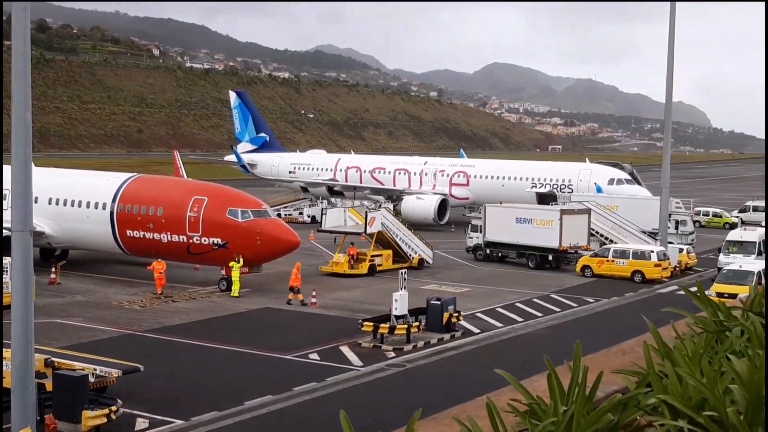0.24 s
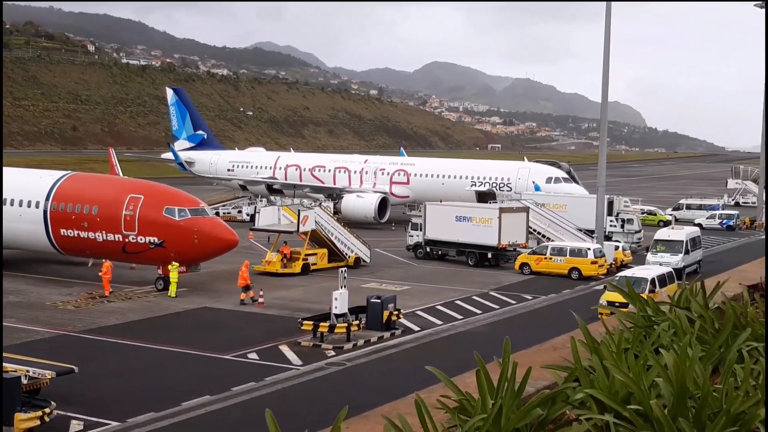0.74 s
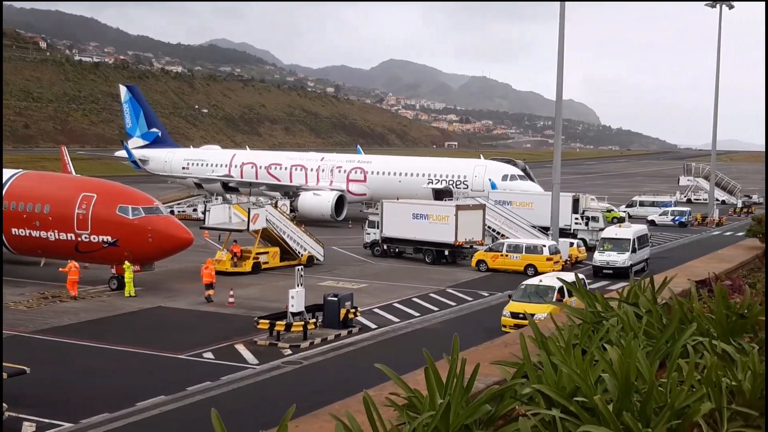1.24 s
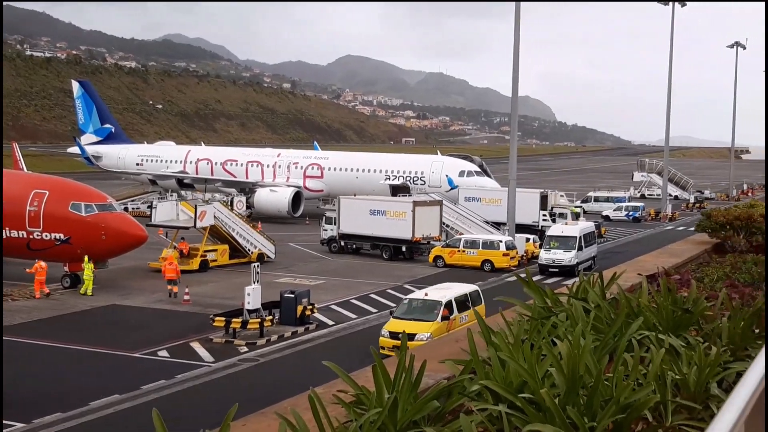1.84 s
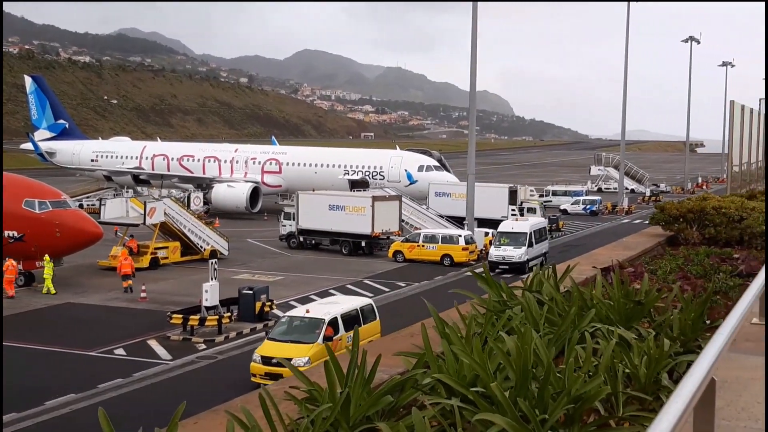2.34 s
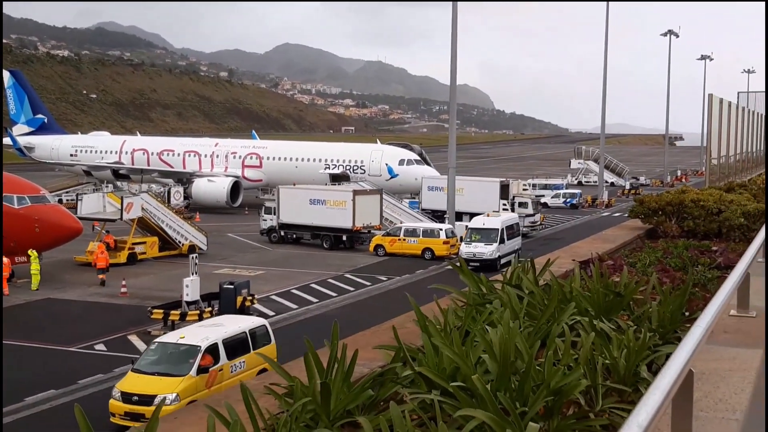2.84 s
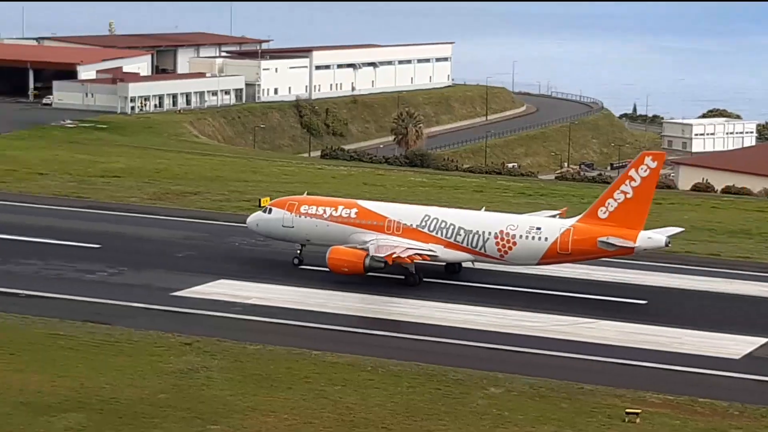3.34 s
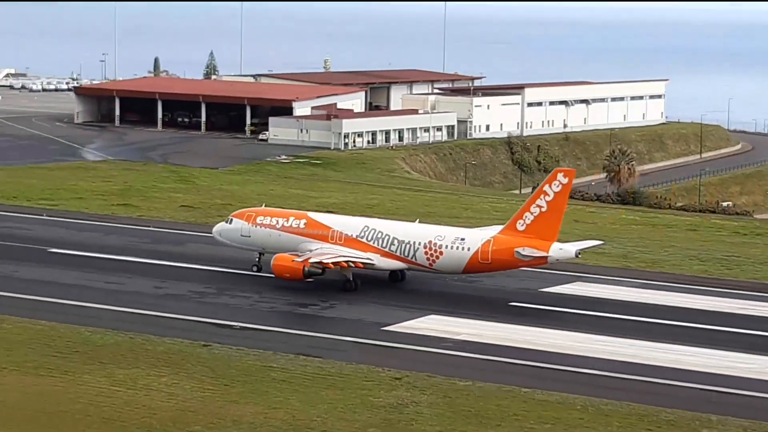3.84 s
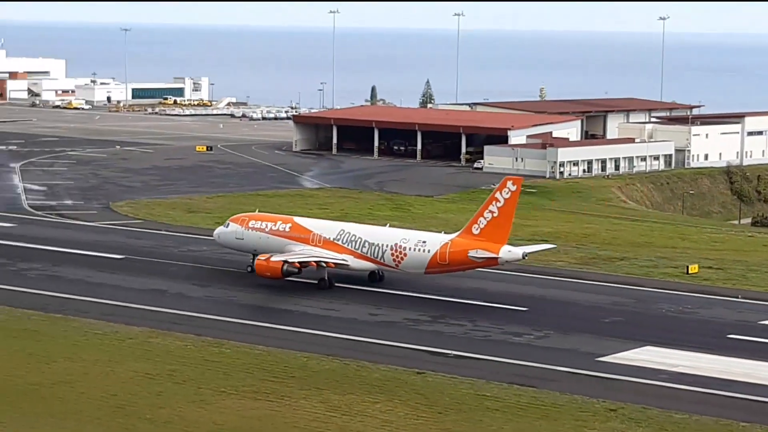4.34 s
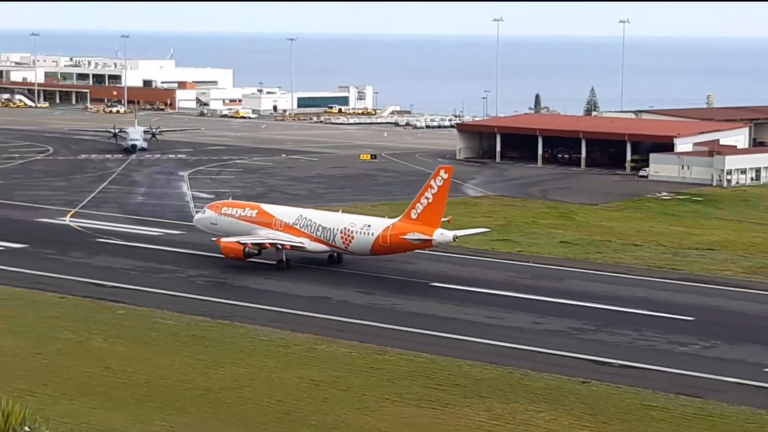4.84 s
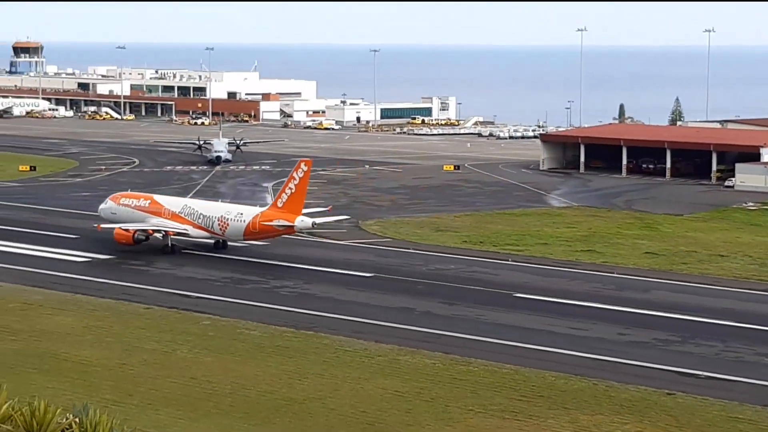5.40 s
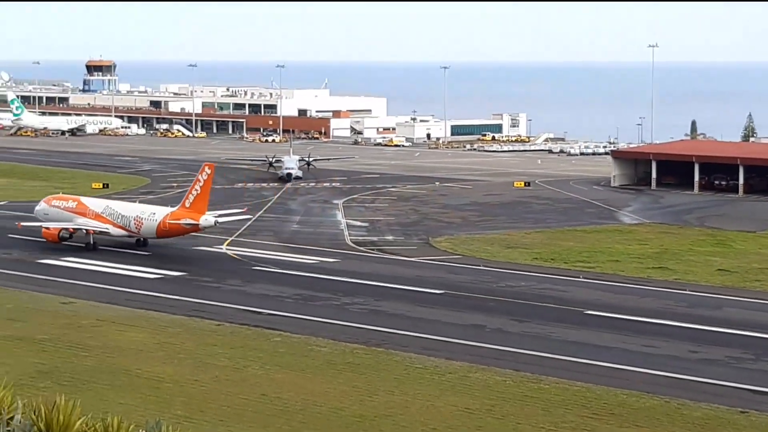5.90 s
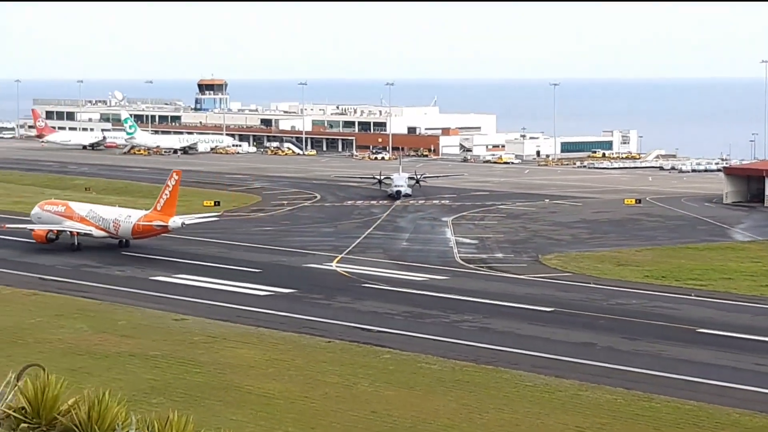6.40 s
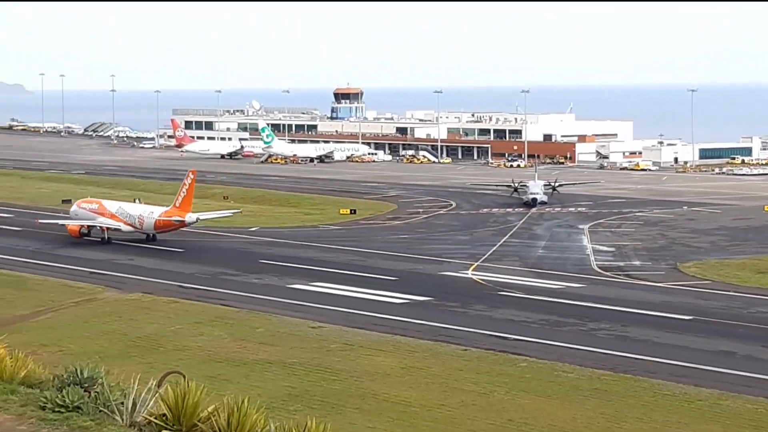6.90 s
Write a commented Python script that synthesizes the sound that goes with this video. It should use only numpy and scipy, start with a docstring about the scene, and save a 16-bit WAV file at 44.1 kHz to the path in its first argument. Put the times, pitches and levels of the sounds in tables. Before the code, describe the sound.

Outdoors on an airport terrace, a low distant rumble mixes with thin, fluttering hiss from idling turbines, while small gusts softly thump the microphone. After about three seconds it cuts to a very brief silence, then a much louder jet at take-off thrust bursts in: broad exhaust roar, rushing fan hiss and a piercing whine that slides down and fades as the aircraft rolls away.

```python
"""A distant rumble and the hiss of idling turbines fill an airport terrace; puffs of breeze thump the microphone.
After a very short silence an airliner rolls away at take-off thrust: exhaust roar, fan hiss and a falling whine.
Apron and roar are noise shaped over time and frequency; each puff is a short burst of low noise.
The whine is a set of tones from two fans, lowered by the aircraft's retreat.
Reflections close to the microphone cut notches into the aircraft's sound."""
import sys
import numpy as np
from scipy import signal
from scipy.io import wavfile
from scipy.ndimage import uniform_filter1d, minimum_filter1d

SR = 44100
rng = np.random.default_rng(int(sys.argv[2]) if len(sys.argv) > 2 else 0)


def pcm_store(signal):
    """Save signal as 16-bit PCM."""
    levels = np.round(np.clip(np.atleast_2d(signal), -1, 1) * 32767)
    wavfile.write(sys.argv[1], SR, levels.astype(np.int16).T)


N = 315755
TIME = np.arange(N) / SR
APRON_END, JET_START = 3.143, 3.216  # s
SIZE, HOP = 2048, 512  # samples in a short-time frame, and from one frame to the next
FRAME_S = np.arange(N // HOP + 5)[:, None] * HOP / SR
BIN_HZ = np.fft.rfftfreq(SIZE, 1 / SR)


def gain_of(db):
    """Turns decibels into amplitude."""
    return 10 ** (np.asarray(db) / 20)


def evened(x):
    """Scales a signal to rms 1."""
    return x / np.sqrt(np.mean(abs(x) ** 2) + 1e-20)


def read(points, column=1):
    """Reads one column of a spectrum table at every bin, along log frequency."""
    table = np.transpose(points)
    return np.interp(np.log(BIN_HZ + 1), np.log(table[0] + 1), table[column])


def curve(points):
    """Reads a table of times and levels at every frame."""
    return np.interp(FRAME_S, *np.transpose(points))


def bell(x, centre, half_width):
    """Draws a smooth hump of height 1, down to 1/e at the half width."""
    return np.exp(-((x - centre) / half_width) ** 2)


def above(corner_hz):
    """Rises gently from 0 in the bass to 1 in the treble, with one half at the corner."""
    return BIN_HZ ** 2 / (BIN_HZ ** 2 + corner_hz ** 2)


def noise():
    """Draws random short-time spectra, which sound as steady noise."""
    shape = (len(FRAME_S), len(BIN_HZ))
    return rng.standard_normal(shape) + 1j * rng.standard_normal(shape)


def patches(length_s, width_hz):
    """Smooths chance over time and frequency into patches of rms 1; larger settings give larger patches."""
    white = noise().real
    rate = np.fft.fftfreq(len(FRAME_S), HOP / SR)[:, None]
    lag = np.fft.fftfreq(len(BIN_HZ), SR / SIZE)
    smoothing = bell(rate * length_s, 0, 0.74) * bell(lag * width_hz, 0, 0.86)
    return evened(np.fft.ifft2(np.fft.fft2(white) * smoothing).real)


def wander(rate_hz):
    """Joins random points, this many per second, into a wavering line."""
    points = rng.standard_normal(N // 50)
    return np.interp(TIME * rate_hz, np.arange(len(points)), points)


def to_sound(z):
    """Turns short-time spectra (ports, frames, bins) into samples."""
    return signal.istft(np.swapaxes(z, -1, -2), nperseg=SIZE, noverlap=SIZE - HOP)[1][..., :N]


def lead(ms):
    """Turns the phase of a sound so that it arrives earlier."""
    return np.exp(2j * np.pi * BIN_HZ * ms / 1000)


# colour of the apron din; only its shape counts: f/Hz, level/dB per Hz
APRON_SPECTRUM = [(35, -29), (66, -2), (102, -2.5), (200, -9.5), (342, -5), (431, -6.5), (819, -11.5),
                  (1090, -12.5), (1450, -14), (2150, -15.5), (2450, -16.5), (2780, -22), (3050, -19),
                  (3350, -17.5), (4600, -21), (5610, -21), (7200, -25.5), (8550, -30), (10600, -34),
                  (15000, -33.5)]
# how alike the din is at left and right: f/Hz, likeness (0 to 1)
APRON_LIKENESS = [(60, 0.27), (220, 0.35), (420, 0.46), (780, 1), (1050, 0.99), (1400, 0.69), (1900, 0.041),
                  (5800, 0.13), (12000, 0.1)]
# hums and whistles of idling turbines and motors: f/Hz, half width/Hz, level over the din/dB
TURBINE_HUMS = [(12850, 930, 16.5), (9680, 120, 10), (9000, 85, 6), (807, 20, 5.5), (417, 15, 0),
                (312, 21, 2.5)]
# rise and fall of the treble; only departures from the mean count: t/s, level/dB
TREBLE_COURSE = [(0.0, -49), (0.85, -51.5), (1.05, -50), (1.06, -52.5), (1.33, -50), (2.3, -53),
                 (2.37, -50), (2.61, -53.5), (3.02, -50), (3.12, -52.5)]
# drops of the breeze, which dip the apron's bass: t/s, half length/s, level/dB
BREEZE_LULLS = [(0.58, .1, -4.5), (1.28, .12, -6), (1.71, .035, -4), (2.93, 0.074, -3)]
# passing colours in the din: t/s, half length/s, f/Hz, half width/Hz, level/dB, left over right/dB
PASSING_SWELLS = [(0.41, .1, 5600, 620, 7.5, -1), (0.77, 0.27, 5460, 650, 7.5, 0),
                  (0.54, 0.31, 7400, 820, 2.5, -3), (1.35, 0.14, 5600, 440, 7, -1),
                  (1.6, 0.36, 5300, 430, 2.5, -3), (1.55, .5, 7000, 700, 0, -3),
                  (1.25, 0.23, 3720, 130, 5, 0), (1.7, 0.19, 3730, 260, 4, 2), (1.7, 0.17, 3040, 100, 6, 0),
                  (2.07, .15, 3000, 120, 11, 2), (0.47, .6, 1420, 130, 4, -3),
                  (1.36, 0.24, 1460, 190, 6.5, -3), (2.07, 0.26, 1420, 170, 3.5, -4),
                  (2.11, 0.2, 2050, 190, 10, 1), (2.58, 0.24, 2150, 170, 6, 0),
                  (2.38, 0.18, 7700, 900, 6.5, -1), (2.83, 0.3, 7560, 520, 8.5, -1),
                  (2.9, .15, 5100, 380, 4.5, 1), (0.15, 0.23, 560, 64, 7, -1),
                  (0.28, 0.82, 720, 100, 1, -2), (0.03, 0.13, 2600, 110, 5, 0)]
APRON_DB = -35.5  # rms level of the apron


def apron():
    """Shapes noise into distant engines and ground vehicles, with the high hiss of idling turbines."""
    db = read(APRON_SPECTRUM) + sum(peak_db * bell(BIN_HZ, hz, width) for hz, width, peak_db in TURBINE_HUMS)
    treble = above(1300)
    db = db + treble * (curve(TREBLE_COURSE) - np.transpose(TREBLE_COURSE)[1].mean())
    db = db - (1 - treble) * 0.5 * (FRAME_S - APRON_END / 2)  # the bass fades by 0.5 dB per s
    lull_db = sum(dip_db * bell(FRAME_S, s, length) for s, length, dip_db in BREEZE_LULLS)
    db = db + lull_db * bell(BIN_HZ, 0, 280)
    db = db + 1.47 * patches(0.032, 440)
    flutter_db = 0.84 - bell(BIN_HZ, 0, 300)  # quick flicker, mostly above the bass
    db = db + flutter_db * patches(0.0084, 19000)
    swells_db = [sum((swell_db + side * pan_db / 2) * bell(FRAME_S, s, length) * bell(BIN_HZ, hz, width)
                     for s, length, hz, width, swell_db, pan_db in PASSING_SWELLS)
                 for side in (1, -1)]
    db = db + np.array(swells_db)
    same = np.clip(read(APRON_LIKENESS), 0, 1)
    right = noise()
    # the part that both ports share reaches the left one 0.26 ms earlier
    left = same * right * lead(0.26) + np.sqrt(1 - same ** 2) * noise()
    sound = to_sound(np.array([left, right]) * gain_of(db))
    return gain_of(APRON_DB) * sound / sound[:, TIME < APRON_END].std()


# strongest puffs of wind, level before the final halving:
# t/s, half length/s, level/dB, lowest f/Hz, top f/Hz, left over right/dB
WIND_PUFFS = [(0.04, 0.012, -39.5, 60, 161, 0), (0.167, 0.021, -36, 65, 131, 0),
              (0.327, 0.019, -38, 60, 300, -2), (0.382, 0.024, -41, 241, 340, 3),
              (0.684, .02, -37, 280, 430, 0), (0.738, 0.015, -35, 60, 130, -2),
              (0.865, 0.018, -33.5, 65, 380, 2), (0.909, .018, -38, 70, 200, -4),
              (0.978, 0.039, -35.5, 70, 430, -1), (1.036, 0.015, -33.5, 90, 263, 0),
              (1.321, 0.0091, -33.5, 200, 553, -3), (1.47, 0.033, -33.5, 74.5, 480, 2),
              (1.597, 0.013, -34, 70, 260, 1), (1.626, .012, -39, 70, 380, 1),
              (1.762, 0.0086, -32.5, 100, 520, -2), (2.044, 0.017, -42.5, 70, 200, -14),
              (2.165, 0.014, -41, 70, 160, -1), (2.39, 0.023, -41, 200, 400, -1),
              (2.523, 0.032, -35, 65, 150, -1), (2.546, .012, -33, 250, 398, -2),
              (2.611, 0.012, -30.5, 170, 423, 4), (2.795, 0.025, -35, 65, 230, 1),
              (3.099, 0.012, -31, 70, 190, -7)]


def wind():
    """Lets each eddy push on the two ports, partly alike, with a dull and hollow thump."""
    out = np.zeros((2, N))
    shared = 0.38  # share of the push's power that is common to both ports
    hollow = signal.iirnotch(205, 3.3, SR)  # a gap at 205 Hz
    for s, length, db, low_hz, top_hz, pan_db in WIND_PUFFS:
        near = abs(TIME - s) < 3 * length
        band = signal.butter(3, [low_hz, top_hz], "bandpass", fs=SR, output="sos")
        common = np.sqrt(shared) * rng.standard_normal(SR // 2)
        push = common + np.sqrt(1 - shared) * rng.standard_normal((2, SR // 2))
        push = signal.lfilter(*hollow, signal.sosfilt(band, push))
        eddy = push[:, -near.sum():] * bell(TIME[near], s, length)
        side_db = np.array([[pan_db], [-pan_db]]) / 2
        out[:, near] += gain_of(db + side_db) * evened(eddy) / 2
    return out


# notches where near reflections cancel the direct sound; a strength over 1 means the reflection is louder:
# f/Hz, width/Hz, strength, shift at the start of the roll/Hz
LEFT_NOTCHES = [(221, 214, .52, 0), (460, 170, .45, 110), (980, 340, .49, 0), (1755, 265, .56, 30),
                (2243, 330, .95, 130), (2740, 270, .92, 180), (3265, 230, .8, 50), (3830, 270, .72, -70),
                (4450, 356, .58, -160), (5850, 330, .45, -200), (6850, 400, .4, -150), (8700, 600, .4, 0),
                (10900, 500, .3, 0)]
RIGHT_NOTCHES = [(211, 120, .6, 0), (515, 200, .48, 50), (1215, 190, .78, 0), (1875, 370, 1.02, -80),
                 (2445, 140, .95, 0), (2990, 380, 1.0, -10), (3610, 318, .95, 90), (4330, 350, 1.45, -30),
                 (5020, 300, 1.3, -90), (5700, 280, .62, 0), (6520, 260, .5, -230), (7020, 340, .45, -220),
                 (7700, 300, .3, 450), (8750, 380, .45, 0), (9570, 220, .45, 0), (10850, 400, .35, 0)]


def ports():
    """Filters the aircraft for each port; the notches slide as the angle changes along the roll."""
    rolled = np.clip((FRAME_S - JET_START) / (TIME[-1] - JET_START), 0, 1)

    def notched(notches):
        """Cancels the sound around each sliding notch frequency."""
        return np.prod([1 - strength / (1 + 2j * (BIN_HZ - hz - slide * (1 - rolled) ** 2) / width)
                        for hz, width, strength, slide in notches], axis=0)

    left_lead_ms = 0.043 + 0.12 * rolled
    return np.array([notched(LEFT_NOTCHES) * lead(left_lead_ms), notched(RIGHT_NOTCHES)])


RUNWAY_M, PAST_M = 170, 10  # distance to the runway; how far past the terrace the roll begins
SPEED_M_PER_S, ACCEL_M_PER_S2, SOUND_M_PER_S = 48, 1, 343  # speed at the start, its growth, speed of sound
FAN_HZ = 2656  # blade tone at the engine


def roll(s):
    """Places the aircraft: distance in m, cosine of the angle from astern, fan pitch lowered by its retreat."""
    since = np.maximum(s - JET_START, 0)
    along = PAST_M + SPEED_M_PER_S * since + ACCEL_M_PER_S2 * since ** 2 / 2
    distance = np.hypot(RUNWAY_M, along)
    astern = along / distance
    retreat = (SPEED_M_PER_S + ACCEL_M_PER_S2 * since) * astern
    return distance, astern, FAN_HZ / (1 + retreat / SOUND_M_PER_S)


# turbulent air makes single partials flare up or drop: t/s, half length/s, multiple of the fan tone, level/dB
PARTIAL_FLARES = [(3.8, 0.06, 1, 4.5), (4.06, 0.07, 1, 5), (4.34, 0.07, 1, -6), (4.85, .1, 1, 2),
                  (5.57, .11, 1, 9), (5.84, .07, 1, 4), (6.35, .11, 1, 9), (6.59, .05, 1, 6),
                  (3.28, .08, 2, 6), (3.5, .05, 2, -5), (3.74, .05, 2, -6), (3.88, 0.055, 2, 7),
                  (4.07, .03, 2, 3), (4.2, 0.04, 2, 8), (4.2, 0.025, 3, 17), (4.71, 0.07, 2, 6.5),
                  (4.57, .05, 3, 13)]


def flare(s, multiple):
    """Gives the dB by which turbulence lifts one partial of the fan at time s."""
    return sum(db * bell(s, at, length) for at, length, k, db in PARTIAL_FLARES if k == multiple)


# colour of the engine roar halfway through the roll; only its shape counts:
# f/Hz, left level/dB per Hz, right level/dB per Hz
ROAR_SPECTRUM = [(32, -36, -32), (65, -16, -3.5), (100.5, 1, -0.5), (301, -4, 1), (402, -10.5, -10.5),
                 (676, -13, -13.5), (1090, -21.5, -19.5), (1350, -19.5, -19.5), (1550, -22.5, -20.5),
                 (2100, -22.5, -20.5), (2700, -22.5, -20.5), (3060, -25, -20), (3950, -26.5, -29),
                 (4950, -32.5, -26), (5380, -35.5, -26.5), (6100, -40, -28), (7800, -42.5, -41),
                 (8450, -50, -48.5), (10460, -57.5, -57), (12350, -62.5, -64), (13800, -82, -80)]
# how much stronger each band is straight behind than at the side: f/Hz, level/dB
REARWARD_BEAM = [(50, -6), (130, 6), (300, -3.5), (700, -4), (1400, -3), (2200, -1.5), (4000, 2),
                 (5200, -14), (6400, 6.5), (8000, -11), (10500, -25.5), (13000, -32)]
# wavering of the hiss: t/s, level/dB
HISS_COURSE = [(3.22, 5.5), (3.5, 3), (4.0, -1), (4.2, 1), (4.4, -1), (4.7, 0), (5.1, -1), (5.45, -4.5),
               (6.05, -4.5), (6.35, -0.8), (7.15, -4)]
# wavering of the highest hiss: t/s, level/dB
TOP_HISS_COURSE = [(3.22, -8.5), (4.2, 1), (4.4, -3), (4.7, 2), (5.3, 3.5), (5.8, 7), (7.15, 3.5)]
# wavering of the deepest rumble: t/s, level/dB
DEEP_RUMBLE_COURSE = [(3.25, 8), (3.5, -2), (3.72, -14), (4.05, -18), (4.3, -17), (4.9, 0.5), (5.5, -4),
                      (6.25, 3), (6.7, 12), (7.15, -2)]
# surges of the exhaust's bass: t/s, level/dB
BASS_SURGES = [(3.5, -3.5), (3.78, 3.5), (4.15, 5), (4.47, 9), (4.7, 5.5), (5.2, 3.5), (5.65, -1.5),
               (6.12, 6.5)]
# partials of the fan and their noisy skirts, played by exhaust() and whine():
# multiple, level/dB, fading/dB per s, skirt level/dB, skirt centre above the partial/Hz,
# skirt half width/Hz, lobe direction (cosine from astern), lobe level/dB
FAN_PARTIALS = [(1, -0.5, 2, 3.5, 130, 120, 0.25, 6), (2, -3, 7, 0.5, 220, 180, 0.22, 6),
                (3, -15, 7, 1, -250, 380, 0.67, 3), (4, -29, 12, 12, -2, 80, .15, 0)]
JET_DB = -12.5  # rms level of the roar
AIR_DB_PER_M = 0.1274  # loss in air at 10 kHz; it grows with the square of frequency


def exhaust(paths):
    """Shapes jet mixing noise and fan hiss by distance, angle and air loss; turbulence makes them waver."""
    distance, astern, fan_hz = roll(FRAME_S)
    mid_distance, mid_astern, _ = roll((JET_START + TIME[-1]) / 2)
    turned = astern - mid_astern
    db = read(REARWARD_BEAM) * turned - 20 * np.log10(distance / mid_distance)
    db = db - AIR_DB_PER_M * (distance - mid_distance) * (BIN_HZ / 10 ** 4) ** 2
    for multiple, _, _, skirt_db, above_hz, width, _, _ in FAN_PARTIALS:
        # the skirts die away after the start, and follow the flares a little
        lift_db = skirt_db * bell(FRAME_S, JET_START, 1.4) + 0.23 * flare(FRAME_S, multiple)
        db = db + lift_db * bell(BIN_HZ, multiple * fan_hz + above_hz, width)
    db = db + 12 * turned * bell(BIN_HZ, 2800, 600)  # the nozzles beam their rush rearwards
    db = db + curve(HISS_COURSE) * above(2040)
    db = db + curve(TOP_HISS_COURSE) / (1 + (8600 / (BIN_HZ + 1)) ** 8)
    # the body of the roar drains away ever faster
    db = db - 0.19 * (FRAME_S - JET_START) ** 2 * bell(BIN_HZ, 340, 190)
    db = db + curve(DEEP_RUMBLE_COURSE) / (1 + (BIN_HZ / 68) ** 6)
    surges_db = sum(surge_db * bell(FRAME_S, s, 0.065) for s, surge_db in BASS_SURGES)
    db = db + surges_db * bell(BIN_HZ, 0, 180)
    db = db + 0.5 * patches(0.069, 15000) + 0.52 * patches(0.13, 650)

    diffuse = np.sqrt(0.087 * BIN_HZ / (BIN_HZ + 2500))  # scattered by the hillside and buildings
    # short waves reach the two ports unrelated
    smeared = 0.95 / (1 + (5800 / (BIN_HZ + 1)) ** 6)
    direct = np.sqrt(1 - smeared) * paths * noise()
    unrelated = np.sqrt(diffuse ** 2 + smeared * abs(paths) ** 2) * np.array([noise(), noise()])
    # at first the left port misses some of the fan hiss
    shaded_db = -10 * bell(BIN_HZ, 5050, 600)
    turn_db = 1.5  # the balance drifts to the right as the angle turns
    left_db = read(ROAR_SPECTRUM, column=1) - (turn_db / 2 + shaded_db) * turned
    right_db = read(ROAR_SPECTRUM, column=2) + turn_db * turned / 2
    sound = to_sound((direct + unrelated) * gain_of(np.array([left_db, right_db]) + db))
    sound = sound * gain_of(0.88 * wander(110))  # fast tearing of the level
    return gain_of(JET_DB) * sound / sound[:, TIME > JET_START].std()


FAN_DB = -29.5  # base level of the whine at the runway distance; each partial adds its own level
FANS = [(1, 0), (0.85, -14)]  # near and far fan: speed ratio, level/dB


def whine(paths):
    """Sums the tones of two fans; their narrow lobes sweep past and hot air shakes pitch and level."""
    distance, astern, fan_hz = roll(TIME)
    since = np.maximum(TIME - JET_START, 0)
    tone = np.zeros(N)
    for speed, engine_db in FANS:
        turns = np.cumsum(fan_hz * (speed + 0.0011 * wander(220))) / SR
        for multiple, partial_db, fade_db, _, _, _, direction, lobe_db in FAN_PARTIALS:
            level_db = FAN_DB + engine_db + partial_db - fade_db * since
            level_db = level_db + lobe_db * bell(astern, direction, 0.11)
            level_db = level_db + flare(TIME, multiple) + 1.7 * wander(18)
            tone += gain_of(level_db) * RUNWAY_M / distance * np.cos(2 * np.pi * multiple * turns)
    padded = np.pad(tone, (0, 2 * SIZE))
    z = signal.stft(padded, nperseg=SIZE, noverlap=SIZE - HOP)[2].T[:len(FRAME_S)]
    return to_sound(paths * z)


def scene():
    """Plays the apron, a moment of silence, then the take-off."""
    first = np.clip((APRON_END - TIME) / 0.0059, 0, 1)
    second = np.clip((TIME - JET_START) / 0.00055, 0, 1)
    paths = ports()
    return first * (apron() + wind()) + second * (exhaust(paths) + whine(paths))


def record(dry):
    """Applies the microphone's low cut, a fast limiter that turns down the highest peaks, then the band limit."""
    x = signal.sosfilt(signal.butter(5, 42, "highpass", fs=SR, output="sos"), dry)
    room = np.minimum(1, 0.96 / (abs(x).max(axis=0) + 1e-9))
    x = x * uniform_filter1d(minimum_filter1d(room, size=301), size=301)
    band_limit = signal.firwin(255, 14600, window=("kaiser", 9), fs=SR)
    return signal.oaconvolve(x, band_limit[None], "same")


dry = scene()
out = record(dry)
pcm_store(out)
```